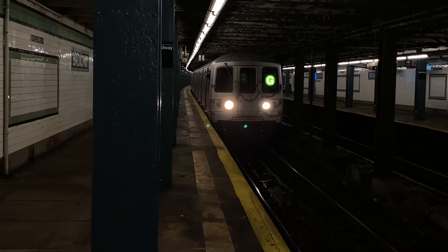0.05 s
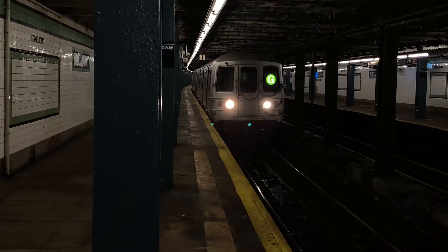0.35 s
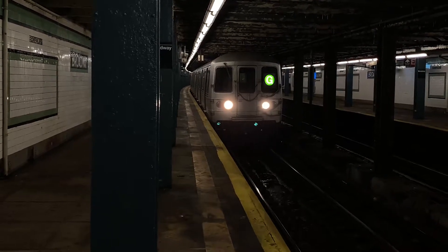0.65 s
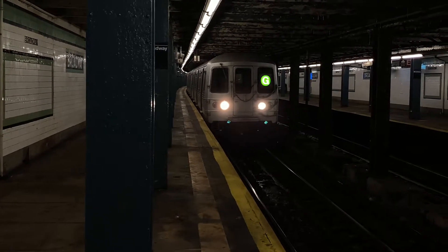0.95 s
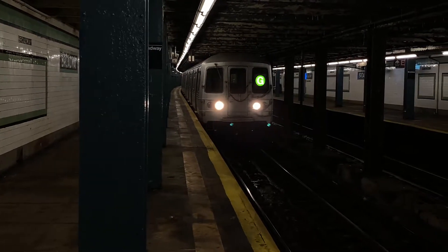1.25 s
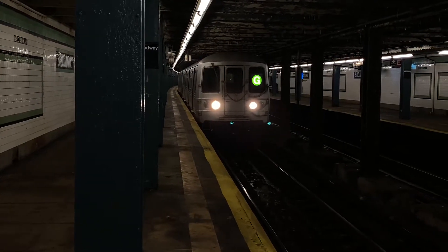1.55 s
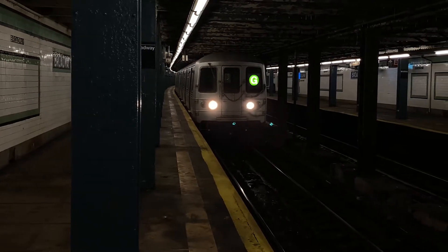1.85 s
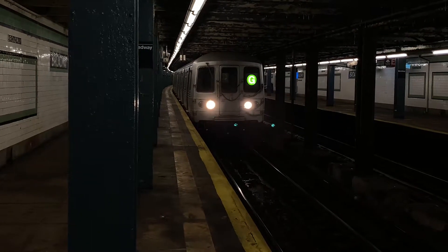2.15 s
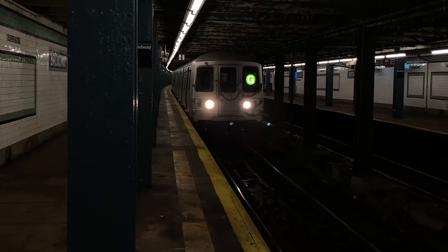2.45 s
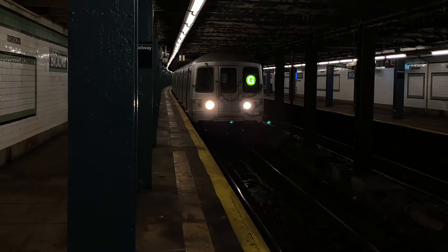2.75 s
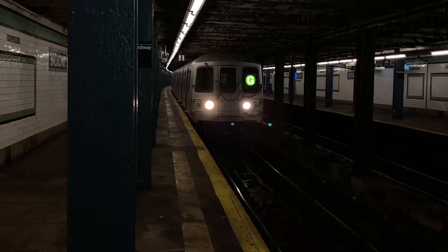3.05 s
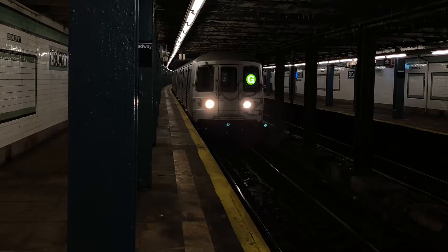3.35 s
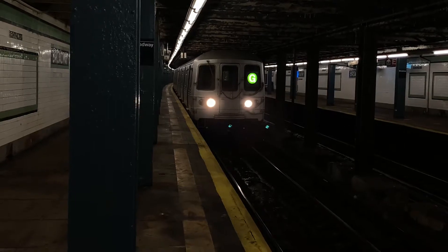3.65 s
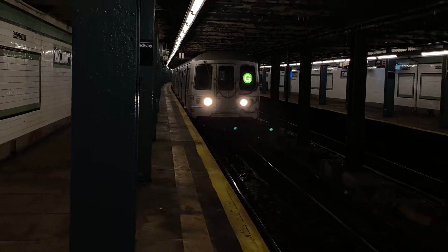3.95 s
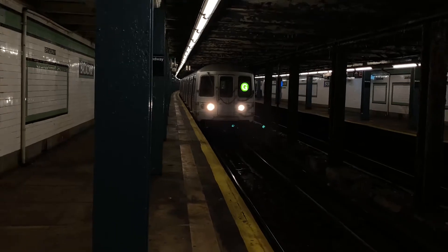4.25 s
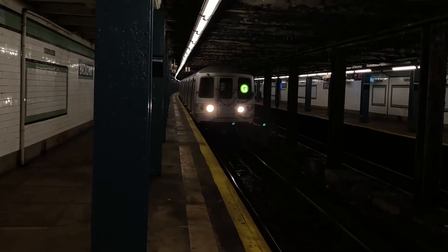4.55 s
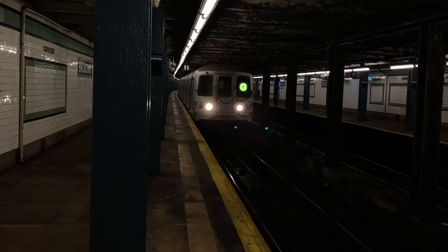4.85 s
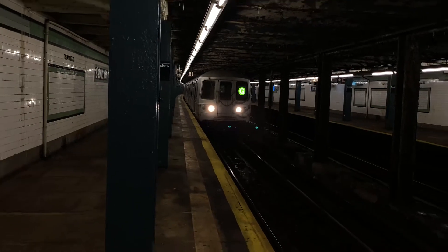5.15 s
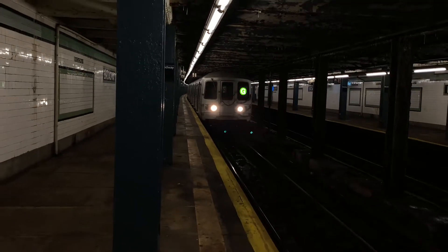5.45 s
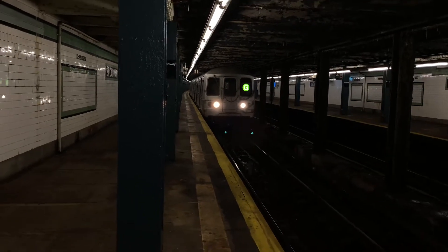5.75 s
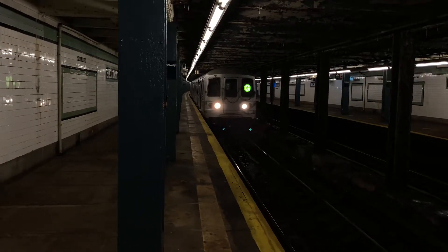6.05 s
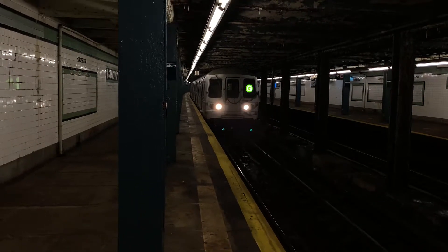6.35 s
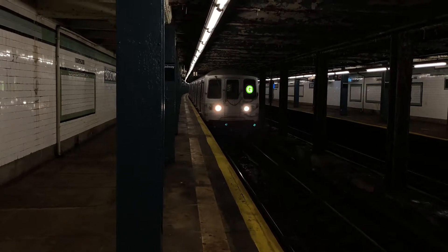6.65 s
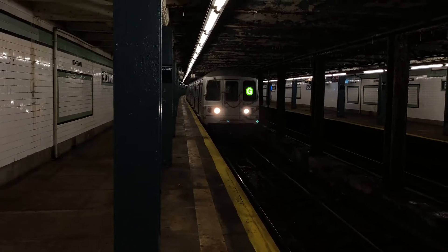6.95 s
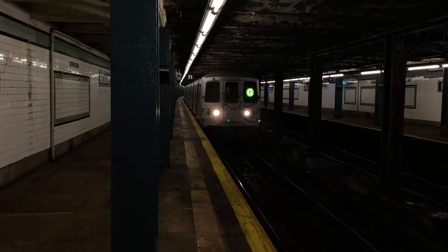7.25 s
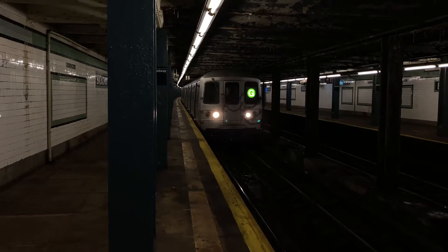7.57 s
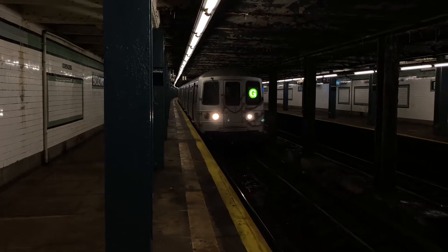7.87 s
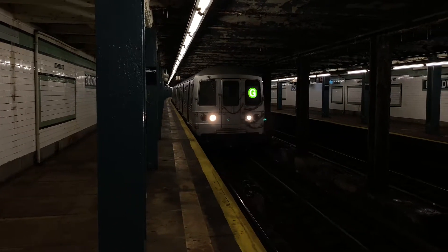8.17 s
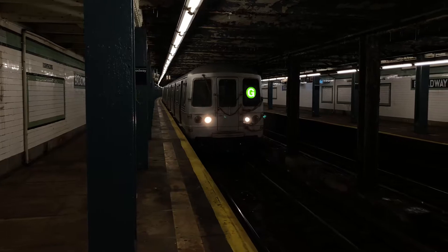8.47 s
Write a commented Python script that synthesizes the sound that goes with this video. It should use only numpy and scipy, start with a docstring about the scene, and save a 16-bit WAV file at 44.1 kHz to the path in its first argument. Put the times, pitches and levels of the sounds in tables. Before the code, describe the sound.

A subway train releases its brakes with a long loud hiss, then lurches and creeps off, rumbling and whining in an underground station.

```python
"""A subway train dumps its brake air in a tiled underground station: a long jet hiss that rings the
exhaust pipe and dulls as the pressure falls. Under it, tunnel air roars and the air compressor chugs.
A valve clunks before the hiss, the cars lurch with a boom during it, and small valves spit.
The train creeps forward: the wheels stick, slip and groan, and the gears whine upward over a growing rumble."""
import sys
import numpy as np
from scipy import signal
from scipy.fft import rfft, irfft, next_fast_len
from scipy.io import wavfile
from scipy.ndimage import map_coordinates

SR = 44100
rng = np.random.default_rng(int(sys.argv[2]) if len(sys.argv) > 2 else 0)


def wav_record(signal):
    """Record a signal, one row per channel, as 16-bit PCM in the file named by sys.argv[1]."""
    frames = np.transpose(np.atleast_2d(signal))
    bounded = np.clip(frames, -1, 1)
    # unit amplitude maps onto the largest positive 16-bit level
    quanta = np.round(bounded * 32767).astype(np.int16)
    wavfile.write(sys.argv[1], SR, quanta)


N = 384111
T = np.arange(N) / SR
# Compressor unloads, brakes vent, cars start to creep, motors take full power.
UNLOAD_S, VENT_S, START_S, POWER_S = 1.89, 2.768, 4.2, 6.55
WALKING_MESH_HZ, WHEEL_RESONANCE_HZ, TOP_HZ = 400, 346, 15800


def undb(db):
    """Decibels to gain."""
    return np.exp(np.asarray(db) * (np.log(10) / 20))


def unit(x):
    """Scale to rms 1."""
    return x / np.sqrt(np.mean(x ** 2))


def ramp(start_s, rise_s):
    """Linear rise from 0 to 1, then hold."""
    return np.clip((T - start_s) / rise_s, 0, 1)


def since(start_s):
    """Seconds since start_s, 0 before it."""
    return np.maximum(T - start_s, 0)


def walk(rate_hz):
    """Smooth random wander, spread near 1."""
    knots = rng.standard_normal(1024)
    return map_coordinates(knots, [T[::64] * rate_hz], order=3, mode="wrap").repeat(64)[:N]


def spectrum(rows, hz):
    """Interpolate (Hz, value) rows over log frequency."""
    row_hz, values = np.transpose(rows)
    return np.interp(np.log(np.maximum(hz, 1)), np.log(row_hz), values)


def colour(x, db_at):
    """Fixed filter, gain db_at(hz)."""
    size = next_fast_len(x.shape[-1] + 4096, True)
    hz = np.maximum(np.arange(size // 2 + 1) * SR / size, 1)
    return irfft(rfft(x, size) * undb(db_at(hz)), size)[..., :x.shape[-1]]


def evolve(x, db_at, size=512):
    """Time-varying filter, gain db_at(hz, seconds)."""
    hz, t, frames = signal.stft(x, SR, nperseg=size)
    return signal.istft(frames * undb(db_at(hz[:, None], t)), SR, nperseg=size)[1][..., :len(x.T)]


def resonate(x, modes):
    """Lift or dip bands given as (Hz, width Hz, dB)."""
    return colour(x, lambda hz: sum(db / (1 + (2 * (hz - f) / width) ** 2) for f, width, db in modes))


def noise(rows):
    """Diffuse stereo noise of a given spectrum, rms 1."""
    return unit(colour(rng.standard_normal((2, N)), lambda hz: spectrum(rows, hz)))


def station(x, wet_db, t60_low_s, t60_high_s=.5, pillar_db=-3, pillar_s=0.0057):
    """Direct sound, early echoes off pillars and tiles, and a long tail that loses its treble."""
    def tail_db(hz, s):
        t60_s = spectrum([(500, t60_low_s), (12000, t60_high_s)], hz)
        return -60 * s / t60_s - 10 * np.log10(t60_s)

    tail = unit(evolve(rng.standard_normal((2, SR)), tail_db))
    taps = rng.standard_normal((2, SR)) * (rng.random((2, SR)) < .01)
    early = unit(taps * np.exp(-T[:SR] / pillar_s))
    response = undb(wet_db) * (tail + undb(pillar_db) * early) / np.sqrt(SR)
    response[[0, 1], [0, 3]] += 1  # direct sound, left microphone first
    response /= np.sqrt(np.sum(response ** 2) / 2)
    return signal.fftconvolve(np.atleast_2d(x), response, axes=1)[:, :N]


def mesh_hz(creep_hz_per_s=95, power_hz_per_s=172):
    """Gear mesh pitch, the gauge of speed: climbs slowly in the creep, faster under power."""
    return 1 + creep_hz_per_s * (since(START_S) - since(POWER_S)) + power_hz_per_s * since(POWER_S)


def with_speed(db, power):
    """Gain of db at walking pace, growing as a power of speed."""
    return undb(db) * (mesh_hz() / WALKING_MESH_HZ) ** power


# Tunnel air spectrum. Each row: frequency in Hz, relative density in dB.
AIR_SPECTRUM = [(20, -29), (35, -9), (58, 3), (110, -1.5), (220, -4.5), (330, -12), (650, -22.5),
                (1100, -22.5), (2000, -29.5), (3000, -42.5), (4600, -45), (7000, -56), (10000, -62),
                (16000, -71)]


def tunnel_air(db=-35.0, swell_db=0.43):
    """Fans and distant tunnels keep up a steady low roar."""
    return noise(AIR_SPECTRUM) * undb(db + swell_db * walk(2.47))


# Compressor under load. Each row: multiple of the shaft rate, relative level in dB.
CHUG_HARMONICS = [(1, -10.5), (2, -0.5), (3, 2), (4, -6.5), (5, -1), (6, 1), (7, 2.5), (8, -3), (9, -13.5),
                  (10, 0), (11, -12), (15, -9), (16, -34), (17, -8.5), (18, -13), (20, -8), (21, -12.5),
                  (22, -31), (24, -18.5), (32, -12.5), (34, -41.5), (41, -16.5), (43, -42), (46, -15),
                  (61, -37.5), (69, -19.5), (73, -26), (77, -23.5)]
# Compressor running free. Each row: multiple of the shaft rate, relative level in dB.
HUM_HARMONICS = [(3, -6.5), (5, -2.5), (6, 4), (10, -5), (11, -7.5), (17, -22), (21, -14), (22, -16),
                 (31, -20), (41, -34)]
# Compressor valve rattle. Each row: frequency in Hz, relative level in dB.
RATTLE_SPECTRUM = [(300, -2.5), (650, -8), (820, -3), (950, 4), (1100, -3.5), (1350, -24), (1850, -12),
                   (2600, -21), (3100, -17.5), (3600, -24), (4400, -16), (5300, -30), (8000, -42),
                   (16000, -59.5)]


def compressor(shaft_hz=24.58, wander=0.000574, chug_db=-36.0, hum_db=-36, rattle_db=-49.5,
               unload_drop_db=3.5, loaded_hum_drop_db=18, start_drop_db=8, approach_db=7.0):
    """Each shaft turn repeats one chug and valve rattle; a hum rises once the unloader valve opens."""
    size = 8192  # samples per turn
    turn = np.cumsum(shaft_hz * (1 + wander * walk(3))) / SR % 1
    place = (turn * size).astype(int)
    orders = np.arange(size // 2 + 1)
    hz = orders * shaft_hz
    phases = np.exp(2j * np.pi * rng.random((2, len(orders))))
    uneven_db = rng.uniform(-6, 6, len(orders))
    rattle = undb(spectrum(RATTLE_SPECTRUM, hz) + uneven_db) * (hz > 0) * (hz < TOP_HZ)
    unloaded = ramp(UNLOAD_S, 0.28)
    # All sinks as the cars start; chug and rattle return as the train nears.
    nearer_db = approach_db * (mesh_hz() / WALKING_MESH_HZ) ** 2
    out = unit(irfft(rattle * phases))[:, place] * undb(rattle_db + nearer_db)
    chug = CHUG_HARMONICS, chug_db - unload_drop_db * unloaded + nearer_db
    hum = HUM_HARMONICS, hum_db - loaded_hum_drop_db * (1 - unloaded)
    for (harmonics, level_db), phase in zip((chug, hum), phases):
        multiples, db = np.transpose(harmonics)
        gains = np.bincount(np.rint(multiples).astype(int), undb(db), len(orders))
        out += unit(irfft(gains * phase))[place] * undb(level_db)
    return out * undb(-start_drop_db * ramp(START_S, .2))


# Car boom (also in knocks), body rumble, wheel grind. Each row: frequency in Hz, relative density in dB.
BOOM_SPECTRUM = [(18, -39), (30, -19.5), (48, 2.5), (62, 10.5), (85, -1), (120, -17), (250, -56),
                 (1000, -101)]
BODY_SPECTRUM = [(50, -19.5), (90, -1), (125, -8), (220, -5), (320, -10), (450, -24.5), (650, -48),
                 (1500, -51), (6000, -89)]
GRIND_SPECTRUM = [(120, -17.5), (300, 7.5), (450, 3), (700, -7), (1100, -10), (2000, -13.5), (3200, -18),
                  (4400, -22), (5400, -28.5), (6800, -25), (8500, -43.5), (11000, -34.5), (16000, -96)]


def rolling(lurch_boom_db=-27.0, lurch_body_db=-25.5, settle_db_per_s=5, flutter_db=1.55):
    """The cars shudder as they start and slowly settle; boom, rumble and wheel grind grow with speed."""
    shudder = ramp(START_S, 0.067) * undb(-settle_db_per_s * since(START_S))
    boom = np.hypot(undb(lurch_boom_db) * shudder, with_speed(db=-33.0, power=1.2))
    body = np.hypot(undb(lurch_body_db) * shudder, with_speed(db=-29.5, power=1.54))
    grind = with_speed(db=-34.5, power=1.26) * undb(flutter_db * walk(14))
    return noise(BOOM_SPECTRUM) * boom + noise(BODY_SPECTRUM) * body + noise(GRIND_SPECTRUM) * grind


def gears(db=-30, creep_drop_db=17, fade_db_per_s=7, resonance_db=3, resonance_width_hz=70,
          octave_db=-19, rough=0.03454, slip=.025, throb_db=2):
    """Three axles whine at slightly different speeds, louder under power and at the wheel resonance."""
    hz, whine = mesh_hz(), 0
    for axle in (-1, 0, 1):
        phase = 2 * np.pi * np.cumsum(hz * (1 + slip * axle + rough * walk(50))) / SR
        whine = whine + np.sin(phase) + undb(octave_db) * np.sin(2 * phase)
    effort_db = -creep_drop_db * (1 - ramp(POWER_S - .15, 0.096)) - fade_db_per_s * since(POWER_S + 1)
    lift_db = resonance_db / (1 + (2 * (hz - WHEEL_RESONANCE_HZ) / resonance_width_hz) ** 2)
    gain = ramp(START_S, POWER_S - START_S) * undb(db + effort_db + lift_db + throb_db * walk(15))
    return station(unit(whine) * gain, wet_db=6, t60_low_s=3.4, pillar_db=-6.5)


# Wheel stick-slip throbs. Each row: peak time in seconds, relative peak level in dB.
GROAN_THROBS = [(7.055, -17), (7.1, -19.5), (7.21, -20.5), (7.27, -12.5), (7.369, -23.5), (7.429, -14.5),
                (7.52, -21.5), (7.62, -17.5), (7.71, -22), (7.91, -19.5), (8.0, -23.5), (8.12, -29)]


def wheel_groan(rise_db_per_s=447, fall_db_per_s=340, mesh_ratio=1.02, rough=0.0248, octave_db=-23,
                direct_db=-3.3, echo_db=-9.5):
    """Steel sticks and slips; the pitch rises with the gears until it locks on the wheel resonance."""
    hz = np.minimum(mesh_ratio * mesh_hz(), WHEEL_RESONANCE_HZ)
    phase = 2 * np.pi * np.cumsum(hz * (1 + rough * walk(45))) / SR
    throbs_db = [db - rise_db_per_s * np.maximum(peak_s - T, 0) - fall_db_per_s * since(peak_s)
                 for peak_s, db in GROAN_THROBS]
    throbs = undb(np.maximum(throbs_db, -120)).sum(axis=0)
    tone = unit(np.sin(phase) + undb(octave_db) * np.sin(2 * phase)) * throbs
    echo = station(tone, wet_db=20, t60_low_s=1.8, pillar_db=-8)
    return undb(direct_db) * tone + undb(echo_db) * echo


# Blows under the cars. Each row: start in seconds, then boom, thud and clank levels in dB.
KNOCK_EVENTS = [(1.928, -34.5, -24, -37.5), (4.222, -17.5, -27, -50), (4.399, -25.5, -21.5, -44),
                (4.52, -24, -45, -40), (5.81, -47, -26.5, -62), (6.63, -26, -52, -49),
                (7.03, -20.5, -44, -45), (7.64, -18, -42, -63), (8.04, -20, -27, -36),
                (8.21, -31, -33, -43)]
# Thud and clank spectra. Each row: frequency in Hz, relative density in dB.
THUD_SPECTRUM = [(25, -36), (55, -1), (90, 5), (150, -1), (260, -2), (500, -15.5), (1000, -26.5),
                 (4000, -71)]
CLANK_SPECTRUM = [(200, -25), (500, -2), (1100, 3), (1400, 4.5), (1950, -0.5), (2700, -5.5), (4500, -16.5),
                  (6800, -23), (9000, -51), (16000, -62)]
# Struck metal resonances. Each row: frequency in Hz, width in Hz, lift in dB.
METAL_MODES = [(510, 30, 3), (818, 40, -1), (1086, 56, 9), (1570, 50, -1), (1950, 130, 7),
               (2860, 140, -1.5)]


def knocks():
    """Valve gear and couplers take up slack and the car bodies boom; the tunnel smears each blow."""
    age = T[:2 * SR]

    def swell(db, rise_s, t60_s):
        return undb(db - 60 * age / t60_s) * (1 - np.exp(-age / rise_s))

    direct_lift = 1 + .8 * np.exp(-age / .02)  # the blow stands briefly above its echoes
    boom, thud, clank = np.zeros((3, N))
    for start_s, boom_db, thud_db, clank_db in KNOCK_EVENTS:
        start = int(start_s * SR)
        span, room = slice(start, start + len(age)), N - start
        boom[span] += swell(boom_db, rise_s=0.023, t60_s=1.2)[:room]
        thud[span] += swell(thud_db, rise_s=0.042, t60_s=2.36)[:room]
        clank[span] += (direct_lift * swell(clank_db, rise_s=0.011, t60_s=1.0))[:room]
    lows = boom * noise(BOOM_SPECTRUM) + thud * noise(THUD_SPECTRUM)
    return lows + clank * unit(resonate(noise(CLANK_SPECTRUM), METAL_MODES))


# Short spits of air. Each row: start in seconds, level in dB, swell in seconds, fade in dB per second,
# centre in Hz, spread in octaves.
SPIT_EVENTS = [(.98, -69, 0.023, 71, 7000, 0.5), (2.631, -55.5, 0.051, 17, 8150, 1),
               (5.509, -31.5, 0.12, 64, 10800, 0.28), (5.53, -30.5, 0.16, 60, 5800, 0.65),
               (5.61, -29.5, .14, 47, 1780, 1.25), (6.01, -51, 0.04, 91, 10500, 0.15),
               (6.02, -42.5, 0.038, 63, 6150, 0.25)]


def valve_spits():
    """Small valves swell open and die away, each hissing around its own pitch."""
    out, age = np.zeros(N), T[:2 * SR]
    for start_s, db, swell_s, fade_db_per_s, centre_hz, octaves in SPIT_EVENTS:
        white = rng.standard_normal(len(age))
        air = colour(white, lambda hz: -10 * np.log10(1 + 4 * (np.log2(hz / centre_hz) / octaves) ** 4))
        opening = np.sin(np.pi / 2 * np.clip(age / swell_s, 0, 1)) ** 2
        fade = undb(db - fade_db_per_s * np.maximum(age - swell_s, 0))
        start = int(start_s * SR)
        out[start:start + len(age)] += unit(air) * opening * fade
    return station(out, wet_db=-5.0, t60_low_s=1.4, t60_high_s=.35, pillar_db=12)


# Exhaust jet as it opens. Each row: frequency in Hz, relative density in dB.
JET_SPECTRUM = [(200, 5), (330, 1.5), (500, -2), (700, 1), (1000, 1.5), (2000, 2.5), (3500, 0.5), (5000, 1),
                (6200, 0.5), (7800, -13.5), (9600, -7), (12000, -11.5), (15500, -22)]
# Exhaust pipe and under-car resonances. Each row: frequency in Hz, width in Hz, lift in dB.
PIPE_MODES = [(461.5, 24, 11), (932, 62, -6.5), (962, 6.2, 5), (1030, 166, 6.5), (1360, 120, 8),
              (1430, 150, -8), (1700, 16, 4), (1843, 76, 8), (2210, 62, 5), (2560, 41, 10),
              (2687, 105, 7.5), (2810, 33, 8.5), (3050, 25, 9.5), (3190, 170, -9.5), (3524, 92, 8),
              (4140, 110, 2.5), (4510, 100, -5), (4740, 60, 6.5), (5100, 170, 3), (5482, 14, -1),
              (6080, 18, 2), (6210, 660, 4), (6406, 63, 8)]


def brake_vent(db=-21.0, attack_s=0.04, burst_db=0.5, burst_s=.25, close_s=6.31, close_db_per_s=45,
               fade_1khz_db_per_s=5.0, treble_power=0.42, flutter_db=0.65, drift_db=1.56, spread=0.65):
    """The valve snaps open, holds and shuts. Its jet rings a pipe and dulls as the pressure falls."""
    def pressure_fall_db(hz, t):
        return -fade_1khz_db_per_s * (hz / 1000) ** treble_power * np.maximum(t - VENT_S, 0)

    def band_waver_db(hz, t):
        hz_time_grid = np.broadcast_arrays(hz / 200, t * 5)
        return drift_db * map_coordinates(eddies, hz_time_grid, order=1, mode="wrap")

    # Wide plume: a shared core, plus separate turbulence at each microphone.
    plume = rng.standard_normal(N) + spread * rng.standard_normal((2, N))
    eddies = rng.standard_normal((128, 64))
    jet = unit(colour(plume, lambda hz: spectrum(JET_SPECTRUM, hz)))
    jet = signal.sosfilt(signal.butter(2, 200, "high", fs=SR, output="sos"), jet)
    jet = evolve(jet, pressure_fall_db)
    jet = evolve(jet, band_waver_db)
    valve_db = db + burst_db * np.exp(-since(VENT_S) / burst_s) - close_db_per_s * since(close_s)
    hiss = resonate(jet, PIPE_MODES) * ramp(VENT_S, attack_s) * undb(valve_db + flutter_db * walk(18))
    return station(hiss, wet_db=1, t60_low_s=2.0, t60_high_s=0.24, pillar_db=2, pillar_s=0.019)


def scene():
    """Everything heard from the platform."""
    return (tunnel_air() + compressor() + knocks() + brake_vent() + valve_spits()
            + rolling() + gears() + wheel_groan())


# Stereo width. Each row: frequency in Hz, side gain in dB.
SIDE_GAIN = [(60, -11), (125, -12.5), (260, -8.5), (500, -1), (1000, 1.5), (16000, 1)]
# Stereo balance. Each row: frequency in Hz, left minus right gain in dB.
BALANCE = [(60, -2.5), (110, -4), (200, 1.5), (500, -1), (1200, -0.5), (2400, -0.2), (4400, -3),
           (8000, -0.5)]


def record(dry, low_cut_hz=31):
    """Two close microphones hear the bass alike, the treble apart; deepest bass and top are cut."""
    side = colour((dry[0] - dry[1]) / 2, lambda hz: spectrum(SIDE_GAIN, hz))
    # Long waves reach both microphones in step and add up.
    mid = colour((dry[0] + dry[1]) / 2, lambda hz: spectrum([(300, 2.47), (900, 1.3)], hz))
    left = colour(mid + side, lambda hz: spectrum(BALANCE, hz) / 2)
    right = colour(mid - side, lambda hz: -spectrum(BALANCE, hz) / 2)
    low_cut = signal.butter(4, low_cut_hz, "high", fs=SR, output="sos")
    top_cut = signal.ellip(10, .2, 80, TOP_HZ, fs=SR, output="sos")
    return signal.sosfilt(top_cut, signal.sosfilt(low_cut, np.array([left, right])))


dry = scene()
out = record(dry)
wav_record(out)
```